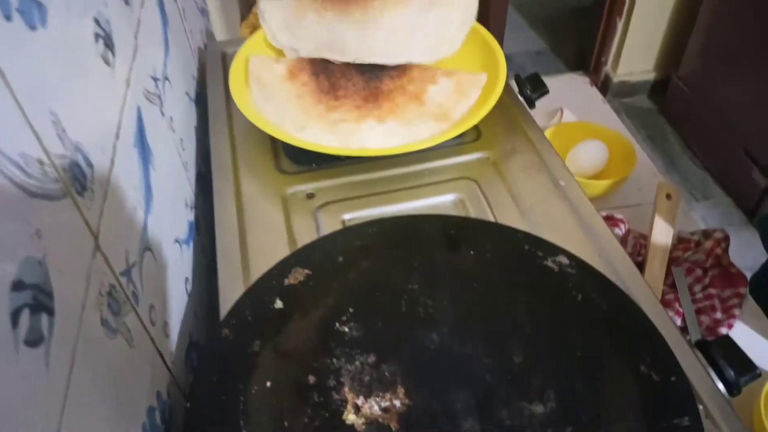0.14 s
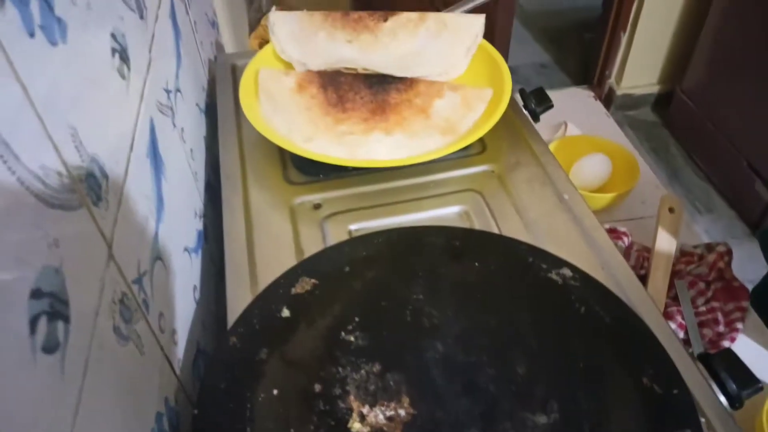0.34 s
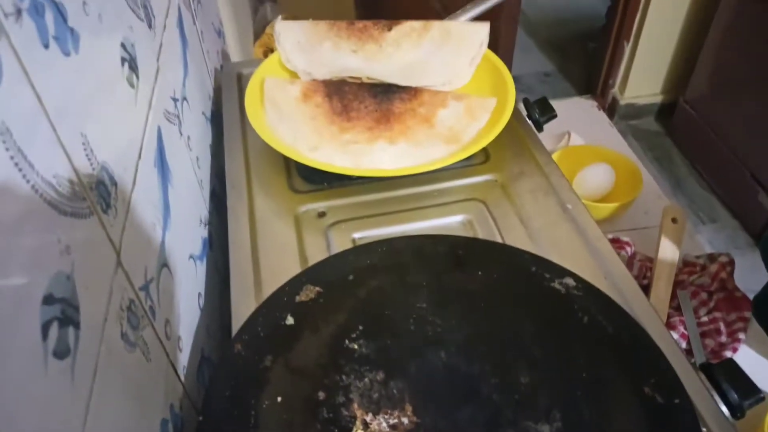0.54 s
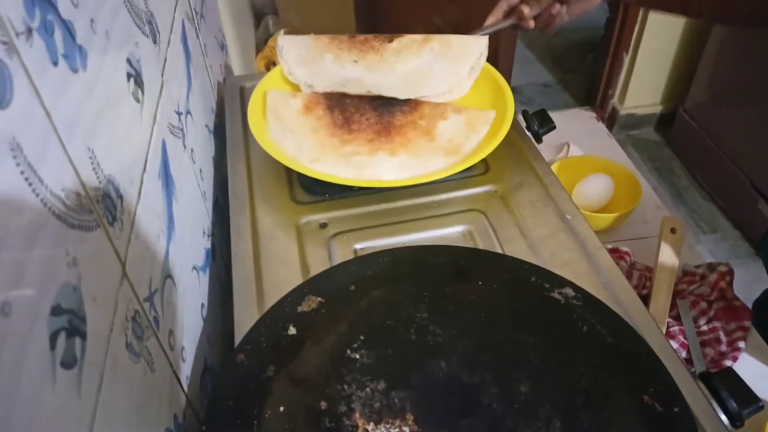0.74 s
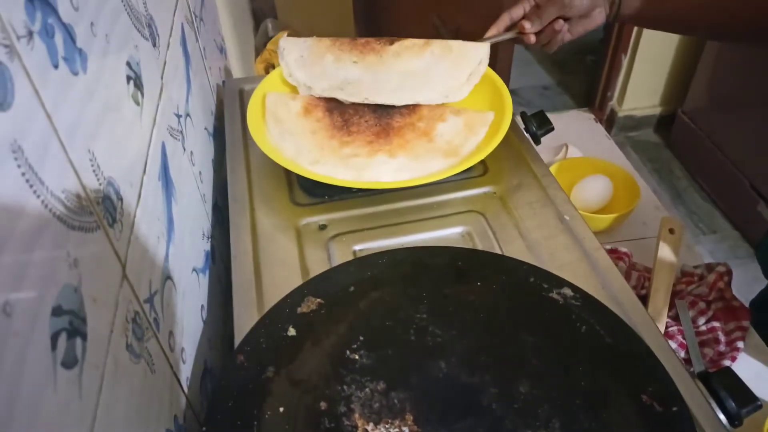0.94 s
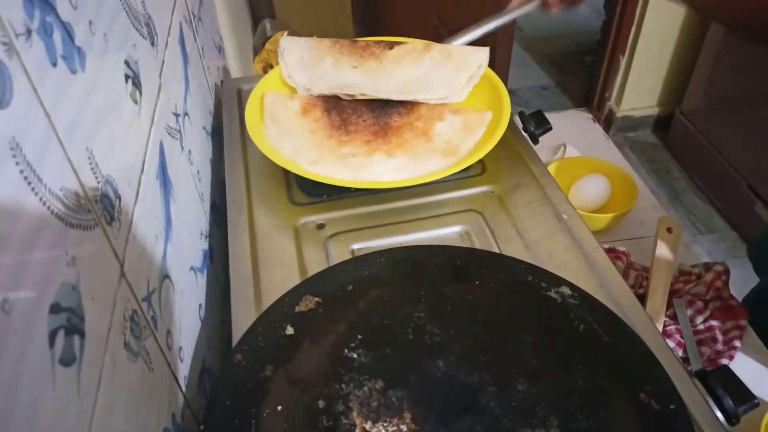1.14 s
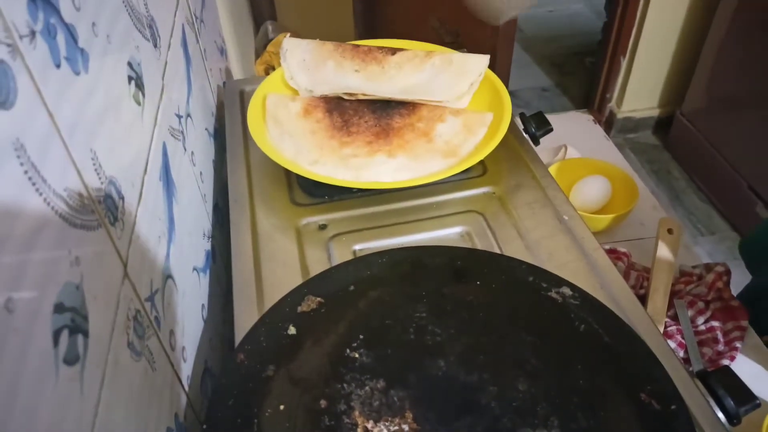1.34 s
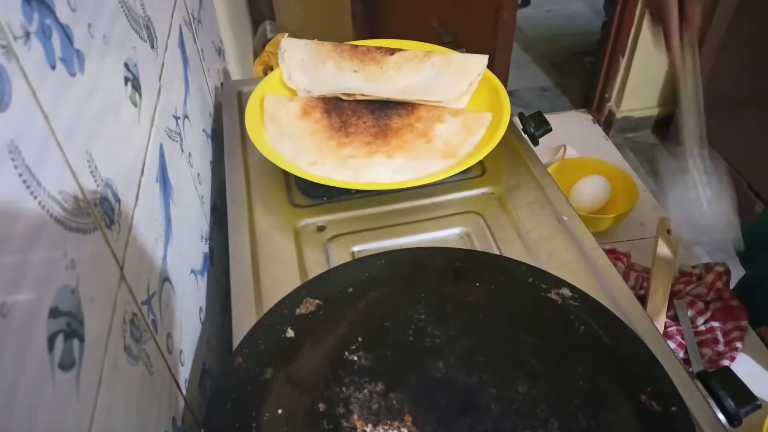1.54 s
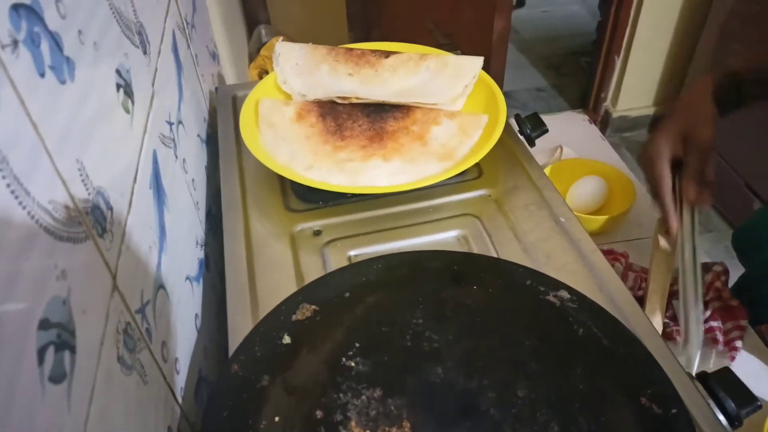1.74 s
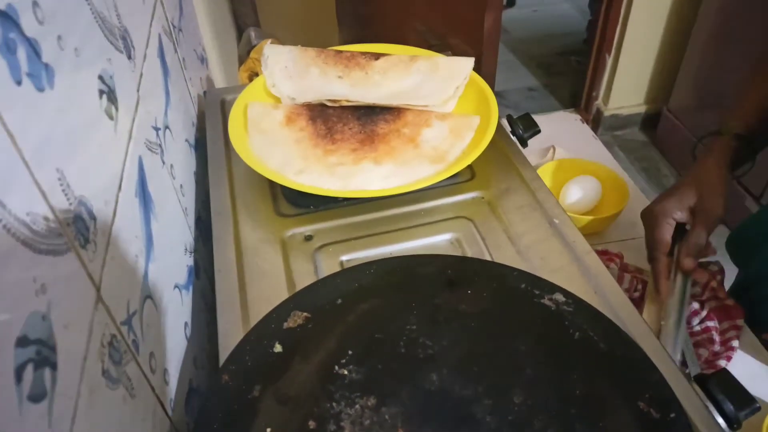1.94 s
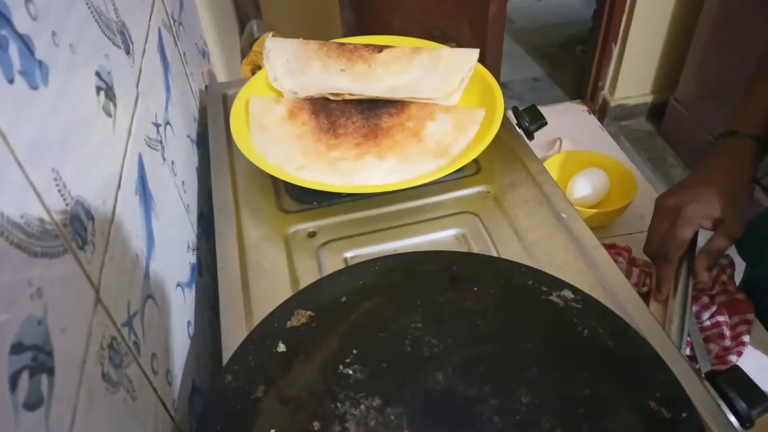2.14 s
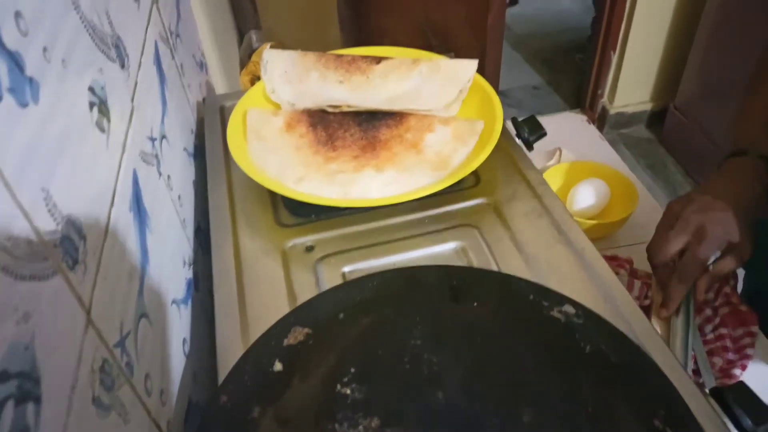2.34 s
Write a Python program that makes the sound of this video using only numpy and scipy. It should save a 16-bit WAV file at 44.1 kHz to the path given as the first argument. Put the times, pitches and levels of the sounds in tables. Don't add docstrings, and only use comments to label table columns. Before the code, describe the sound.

A steel spatula knocks and scrapes on a hollow metal stove top in a small kitchen

```python
import sys
import numpy as np
from scipy import signal
from scipy.fft import rfft, irfft
from scipy.io import wavfile
from scipy.ndimage import uniform_filter1d

SR = 44100
rng = np.random.default_rng(int(sys.argv[2]) if len(sys.argv) > 2 else 0)


def amplitude_ratio(level_db):
    exponent = np.asarray(level_db, float) / 20
    return 10 ** exponent


def wav_record(signal):
    frames = np.transpose(np.atleast_2d(signal))
    bounded = np.clip(frames, -1, 1)
    quanta = np.round(bounded * 32767).astype(np.int16)
    wavfile.write(sys.argv[1], SR, quanta)


N = 110250


def evened(x):
    return x / np.sqrt(np.mean(x ** 2) + 1e-20)


def read(points, hz):
    f, value = np.transpose(points)
    return np.interp(np.log(hz + 1), np.log(f + 1), value, value[0] - 20, value[-1] - 50)


def coloured(x, colour):
    gain = amplitude_ratio(read(colour, np.fft.rfftfreq(len(x), 1 / SR)))
    return evened(irfft(rfft(x) * gain, len(x)))


def add(mix, s, sound):
    part = mix[round(s * SR):][:len(sound)]
    part += sound[:len(part)]


def dying(t, rise_s, t60):
    return (1 - np.exp(-t / rise_s)) * amplitude_ratio(-60 * t / t60)


def slips(count):
    slips_per_s, spread_db = 2500, -2
    size = amplitude_ratio(spread_db * np.minimum(rng.exponential(1, count), 4))
    size = size * (rng.random(count) < slips_per_s / SR)
    return evened(size * rng.standard_normal(count)) + 1.27 * rng.standard_normal(count)


def ring(modes, spot_hz, free):
    spot_db_per_octave, scatter_db, detune = 10, 1, 0.008
    t = np.arange(SR // 2) / SR
    hz, db, t60 = np.transpose(modes)[:, :, None]
    luck = rng.standard_normal((3, len(modes), 1))
    db = db - spot_db_per_octave * abs(np.log2(hz / spot_hz)) + scatter_db * luck[0]
    rise_s = 0.0028 * (400 / hz) ** 2
    hz = hz * (1 + detune * luck[2])
    sag = 1 + 0.026 * np.exp(-t / 0.0054)
    push = dying(t, 0.0034, 2 * free * 0.069) * np.sin(2 * np.pi * spot_hz * t * sag)
    fall = dying(t, rise_s, t60 * free ** (hz / spot_hz))
    body = amplitude_ratio(db) * fall * np.sin(2 * np.pi * hz * t + luck[1] / 4)
    return 0.5 * (push + body.sum(0))


# (frequency [Hz], level [dB])
CRACK_COLOUR = [(500, -9), (750, -17.5), (2800, -10.5), (5100, -17.5), (8300, -16), (9800, -27),
                (14500, -31), (15900, -24)]


def knocks(rows, modes):
    thuds, cracks, t = np.zeros(N), np.zeros(N), np.arange(8192) / SR
    for s, thud_db, spot_hz, crack_db, free in rows:
        add(thuds, s, amplitude_ratio(thud_db) * ring(modes, spot_hz, free))
        crack = coloured(rng.standard_normal(len(t)), CRACK_COLOUR)
        add(cracks, s, amplitude_ratio(crack_db - 8) * dying(t, 0.0012, 0.053) * crack)
    return thuds, cracks


# (time [s], thud level [dB], pitch of the spot [Hz], crack level [dB], share of the free ring time [0-1])
STOVE_KNOCKS = [(.186, -34, 282, -51, 1), (.2448, -19, 295, -13.5, 1), (.2545, -11, 430, -20, 0.55),
                (.263, -22.5, 430, -37, 0.37), (.271, -11, 320, -35, 0.29), (.289, -30, 313, -45, 1),
                (.300, -16, 336, -45, 0.27), (.339, -18, 430, -23.5, 0.46), (.365, -33, 430, -55, 0.52),
                (.377, -22, 209, -53, 0.71), (.410, -31.5, 441, -40, 1), (.456, -23.5, 307, -29.5, 0.56),
                (.497, -30.5, 321, -33.5, 0.75), (.609, -20, 401.6, -22, 0.83), (.645, -32, 327, -48, 0.65),
                (.657, -39, 330, -31, 0.33), (.7095, -20.5, 372, -18, 0.45), (.733, -11, 383, -20.5, 0.31),
                (.742, -17.5, 305, -45, 0.6), (.757, -18, 315, -54, 0.28), (.782, -30, 320, -38, 0.22),
                (.808, -38, 430, -32, 0.5), (.929, -19, 403, -31, 0.6), (.939, -19.5, 320, -57, 0.4),
                (.977, -38.5, 296, -54, 0.83), (1.1095, -11, 494, -18.5, .3),
                (1.131, -18.5, 190, -40, 0.37), (1.1862, -22.5, 430, -24, 0.44),
                (1.223, -20, 394, -20, 0.27), (1.234, -20, 410, -33, 0.36), (1.267, -17, 398, -27, .35),
                (1.276, -16, 293.5, -23.5, 0.85), (1.314, -42, 293, -55, 0.21),
                (1.386, -32, 294, -65, 0.27)]
# (frequency [Hz], level [dB], t60 [s])
STOVE_MODES = [(115.1, -27, 0.45), (164.3, -1, 0.43), (248.5, -2.5, 0.13), (312.3, 6.5, 0.13),
               (396, -0.5, 0.12), (430.5, 1.5, 0.17), (512, -12.5, 0.18), (590, -27, 0.067)]


def stove_knocks():
    return knocks(STOVE_KNOCKS, STOVE_MODES)


# (time [s], thud level [dB], pitch of the spot [Hz], crack level [dB], share of the free ring time [0-1])
COUNTER_KNOCKS = [
    (1.807, -25.5, 233, -37.5, 0.76),
    (1.83, -21, 197, -42, 0.36),
    (1.843, -24.5, 430, -37, 0.28),
    (1.868, -27.5, 166, -38, 0.57),
    (1.907, -33.5, 493, -22.5, 0.5),
    (1.918, -29.5, 430, -52, 0.39),
    (1.956, -57, 450, -36, 0.9),
    (2.04, -27.5, 486, -35.5, 0.47),
    (2.052, -27.5, 202, -36, 0.37),
    (2.14, -36, 253, -60, 1),
]
# (frequency [Hz], level [dB], t60 [s])
COUNTER_MODES = [(123.2, -0.5, 0.46), (165, -11, 0.33), (194.8, 4.5, 0.36), (208, 3, 0.14),
                 (269.5, 4, 0.22), (430, 5.5, 0.15), (513, 1.5, 0.31), (649, 3, 0.13)]


def counter_knocks():
    return knocks(COUNTER_KNOCKS, COUNTER_MODES)


# (time [s], level [dB], frequency [Hz], t60 [s])
CLINKS = [(0.2475, -27, 2920, 0.053), (.2455, -26, 4020, 0.04), (0.245, -20, 8100, 0.023),
          (.6098, -43, 2420, 0.062), (0.608, -38, 4364, 0.09), (.6098, -36, 5770, 0.04),
          (.6098, -47, 6500, 0.045), (0.61, -53, 1870, 0.11), (.62, -41, 5600, .03),
          (1.169, -42.5, 113.5, 2.9), (.7113, -17, 2700, 0.012), (1.108, -26.5, 1210, 0.027),
          (1.111, -20.5, 3550, 0.01), (1.11, -37, 7230, 0.016), (1.115, -45, 5550, 0.28),
          (1.13, -50, 4200, .1), (1.188, -37, 6500, .05), (1.192, -29.5, 1310, 0.029),
          (1.207, -31, 5800, .05), (1.219, -32, 6720, 0.058), (1.2266, -41, 7700, 0.13),
          (1.23, -40, 9800, 0.065), (1.274, -30.5, 6500, 0.047), (1.275, -48.5, 5556, 0.29),
          (1.278, -40, 4860, 0.079), (1.289, -47, 8200, 0.099), (1.186, -27, 2320, 0.053),
          (1.194, -35, 3100, 0.2), (1.2274, -22, 5600, 0.031), (1.2266, -32, 6200, 0.11),
          (1.275, -35, 2627, 0.54), (1.272, -31, 2186, 0.067), (1.272, -29, 2727, 0.087),
          (1.329, -39, 116.2, 0.55), (1.8312, -29, 2000, 0.028), (1.8312, -46, 2300, 0.15),
          (1.9066, -43, 3180, .15), (1.9077, -42.5, 1310, .08), (1.9067, -48, 5938, 0.13),
          (2.042, -34, 2334, 0.049), (2.045, -47, 1297, .25), (2.045, -38.5, 696, 0.13),
          (2.045, -46, 2900, 0.1), (1.8312, -51, 4200, 0.082), (1.9063, -40.5, 2439, 0.41),
          (1.9071, -36, 8070, 0.045), (1.9071, -43.5, 4790, 0.18), (1.956, -51, 11130, 0.22),
          (1.957, -40, 8700, 0.056), (2.349, -28, 2700, 0.024), (2.3487, -35, 1790, 0.018)]


def blade_clinks():
    out, t = np.zeros(N), np.arange(SR) / SR
    for s, db, hz, t60 in CLINKS:
        off, turn = rng.uniform(-1.01, 1, (2, 4, 1))
        side_hz = hz + off * 9.9 / t60
        sides = np.sin(2 * np.pi * side_hz * t + np.pi * turn).sum(0)
        cluster = np.sin(2 * np.pi * hz * t) + min(0.29, 0.05 / t60) * sides
        add(out, s, amplitude_ratio(db - 0.5) * dying(t, 0.0005, t60) * cluster)
    return out


# (start [s], length [s], level [dB], brightest frequency [Hz])
STROKES = [
    (0.167, 0.24, -50.5, 6740),
    (0.971, 0.012, -50.5, 6900),
    (1.052, 0.077, -55, 7900),
    (1.11, 0.21, -44, 5300),
    (1.181, 0.1, -37.5, 6160),
    (1.257, 0.035, -55, 6000),
    (1.831, 0.026, -40.5, 2400),
    (1.904, 0.18, -49, 3400),
]
# (frequency [Hz], level [dB])
STROKE_AIR = [(9000, -18), (11500, -2), (14800, 24), (15900, -6)]
# (frequency [Hz], level [dB])
DRAG_COLOUR = [(500, 3), (1500, -4), (2800, -1.5), (4600, -10), (8300, -7), (9800, -18), (14500, -17.5),
               (15900, -11.5)]


def blade_strokes():
    singing_width_hz, singing_db, clump_db = 56, 12, 4.5
    tilt_db_per_octave, air_db = 7, -16
    count = 8192
    out, hz = np.zeros(N), np.fft.rfftfreq(count, 1 / SR)
    modes_hz = np.geomspace(1000, 12000, num=36)[:, None] * rng.uniform(0.92, 1.03, (36, 1))
    resonances = 1 / (1 + 2j * (hz - modes_hz) / singing_width_hz)
    singing = 1 + amplitude_ratio(singing_db) * resonances.sum(0)
    for s, length, db, top_hz in STROKES:
        u = np.clip(np.arange(count) / SR / length, 0, 1)
        clumps = evened(uniform_filter1d(rng.standard_normal(count), size=350))
        grit = slips(count) * np.sin(np.pi * u ** 0.44) * amplitude_ratio(clump_db * clumps)
        tilt = amplitude_ratio(-tilt_db_per_octave * abs(np.log2((hz + 1) / top_hz)))
        body = coloured(irfft(rfft(grit) * tilt * singing), DRAG_COLOUR)
        scrape = body + amplitude_ratio(air_db) * coloured(grit, STROKE_AIR)
        add(out, s, amplitude_ratio(db) * np.sqrt(length * SR / count / 2) * scrape)
    return out


# (start [s], length [s], level [dB])
RUBS = [
    (2.035, 0.061, -41),
    (2.097, 0.099, -42.5),
    (2.158, 0.16, -52.5),
    (2.426, 0.22, -49),
]
# (frequency [Hz], width [Hz], level [dB])
RUB_MODES = [(129, 15, -6), (190, 17, -4.5), (263.3, 11, 1.5), (498.7, 20, -1.5), (688, 12, -15.5)]


def handle_rubs():
    t, hz = np.arange(N) / SR, np.fft.rfftfreq(N, 1 / SR)
    swell = np.zeros(N)
    for s, length, db in RUBS:
        swell += amplitude_ratio(db) * np.sin(np.pi * np.clip((t - s) / length, 0, 1) ** 0.55)
    body = sum(amplitude_ratio(db) / (1 + 2j * (hz - f) / width) for f, width, db in RUB_MODES)
    padded = rfft(np.r_[swell * slips(N), np.zeros(N)])
    body = np.interp(np.arange(N + 1) / 2, np.arange(len(hz)), body)
    return irfft(padded * body)[:N] / np.sqrt(np.mean(abs(body) ** 2))


# (time [s], level [dB], share of the lower part [dB])
SPITS = [(0.084, -25.5, -19), (0.1209, -11, -19), (0.3057, -27, -24), (0.3288, -15, -32), (0.3332, -22, -6),
         (0.4055, -8, -14.5), (0.6077, -19.5, -25), (0.611, -30, -12), (0.6599, -9, -17.5),
         (0.7116, -13.5, -2.5), (0.7122, 1, -18.5), (1.362, -22.5, -19), (1.5103, -30, -18),
         (2.044, -27, -25), (2.0575, -30, -20), (2.0978, -26, -26), (2.1037, -14.5, -23),
         (2.1655, -14.5, -23), (2.216, -13, -20.5), (2.232, -30, -14.5), (2.2665, -23.5, -22)]
# (frequency [Hz], level [dB])
SPIT_TOP = [(8000, 2.5), (10000, -4.5), (13500, -1), (16600, 7.5)]
# (frequency [Hz], level [dB])
SPIT_LOW = [(1500, -10.5), (3000, -8), (7200, 3.5), (9500, -9)]


def fat_spits():
    echo_s = 0.0148
    out, t = np.zeros(N), np.arange(2048) / SR
    for s, db, low_db in SPITS:
        top, low = rng.standard_normal((2, len(t)))
        pop = coloured(top, SPIT_TOP) + amplitude_ratio(low_db + 13.5) * coloured(low, SPIT_LOW)
        pop = pop * dying(t, 0.00012, 0.0063)
        add(out, s, amplitude_ratio(db - 11) * pop)
        add(out, s + echo_s, amplitude_ratio(db - 28) * pop)
    return out


# (time [s], level [dB])
DRAG_PRESSURE = [(0, -54.5), (.17, -54.5), (.4, -48), (.58, -55.5), (.9, -55), (1.35, -54), (1.64, -58.5),
                 (1.68, -68.5), (1.8, -65.5), (1.85, -50), (2.2, -51.5), (2.5, -59)]


def drag():
    grit = slips(N)
    pressure = amplitude_ratio(np.interp(np.arange(N) / SR, *np.transpose(DRAG_PRESSURE)))
    shake = evened(signal.oaconvolve(grit, ring(STOVE_MODES, 229, 1))[:N])
    return pressure * (amplitude_ratio(0.5) * coloured(grit, DRAG_COLOUR) + amplitude_ratio(-3.5) * shake)


# (frequency [Hz], level [dB])
HUM_COLOUR = [(40, -13), (60, -19), (121, 1.5), (170, -5), (520, -22), (800, -24), (8300, -34.5),
              (15900, -71)]
# (frequency [Hz], width [Hz], level [dB])
HUMPS = [(2700, 610, -63), (112, 32, -64), (68.7, 24, -59.5)]


def kitchen_hum():
    hz = np.fft.rfftfreq(N, 1 / SR)
    out = amplitude_ratio(-53.5) * coloured(rng.standard_normal(N), HUM_COLOUR)
    for top_hz, width, db in HUMPS:
        hump = rfft(rng.standard_normal(N)) / (1 + ((hz - top_hz) / width * 2) ** 2)
        out = out + amplitude_ratio(db) * evened(irfft(hump, N))
    return out


# (frequency [Hz], t60 [s])
ROOM_DECAY = [(150, 0.77), (400, 0.36), (1500, 0.42), (4000, .4), (9000, 0.37), (15000, 0.45)]


def room(x):
    hz, t, z = signal.stft(rng.standard_normal(SR), SR, nperseg=512)
    f, t60 = np.transpose(ROOM_DECAY)
    fall = amplitude_ratio(-60 * t / np.interp(hz, f, t60)[:, None])
    below_top = (hz < 15900)[:, None]
    tail = signal.istft(z * fall * below_top, SR, nperseg=512)[1]
    tail = tail * np.clip(np.arange(len(tail)) / SR / 0.01 - 0.4, 0, 1)
    return signal.fftconvolve(x, tail / np.linalg.norm(tail))[:N]


def scene():
    stove_thud, stove_crack = stove_knocks()
    counter_thud, counter_crack = counter_knocks()
    low = stove_thud + counter_thud + handle_rubs()
    bright = stove_crack + counter_crack + blade_strokes()
    steel, fat = blade_clinks(), fat_spits()
    wet = room(amplitude_ratio(-9) * low + amplitude_ratio(-3.5) * bright + amplitude_ratio(-15) * steel + amplitude_ratio(-19) * fat)
    return (low + bright + steel + fat + wet + drag() + kitchen_hum())[None]


def low_pass(x):
    return signal.sosfilt(signal.butter(12, 16990, fs=SR, output="sos"), x)


def record(dry):
    mix = signal.sosfilt(signal.butter(4, 42, "highpass", fs=SR, output="sos"), dry)
    treble_edge = signal.firwin(255, 16200, window=("kaiser", 8), fs=SR)
    mix = signal.oaconvolve(mix, treble_edge[None], "same")
    return low_pass(mix)


dry = scene()
out = record(dry)
wav_record(out)
```